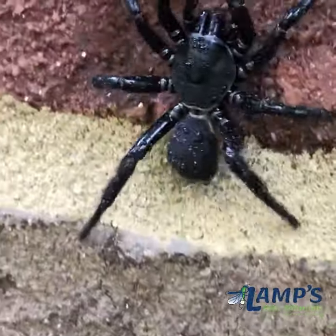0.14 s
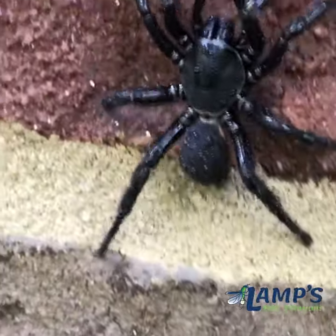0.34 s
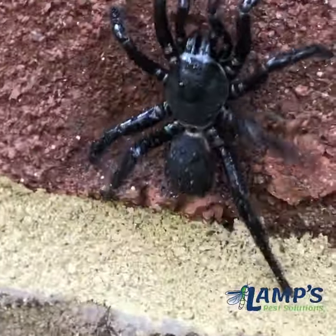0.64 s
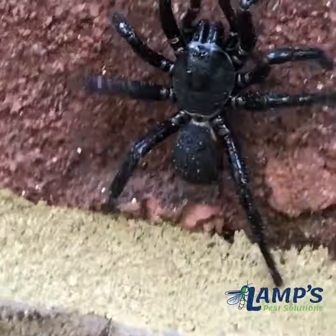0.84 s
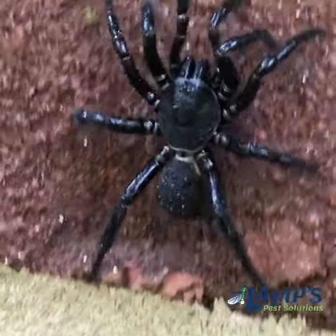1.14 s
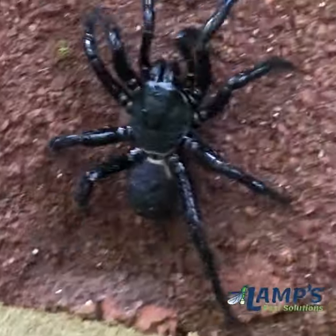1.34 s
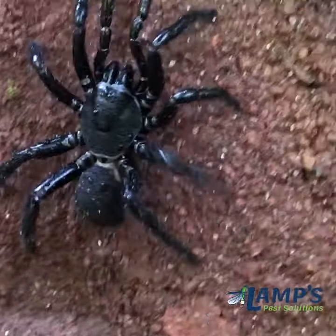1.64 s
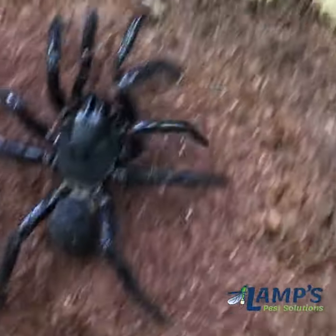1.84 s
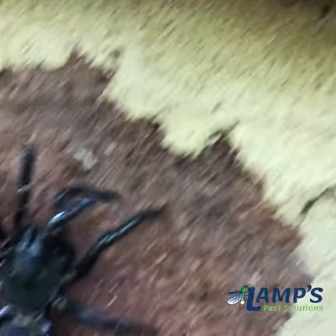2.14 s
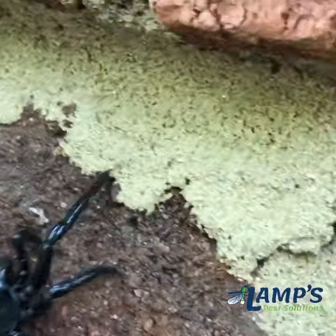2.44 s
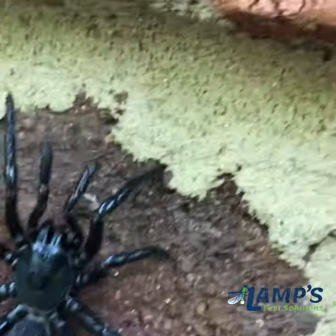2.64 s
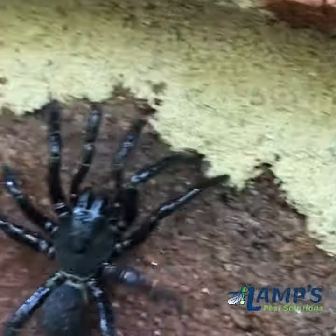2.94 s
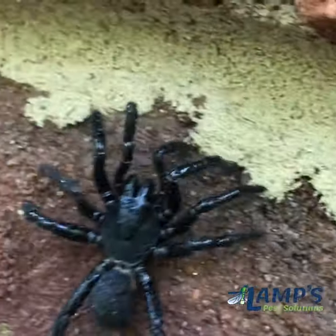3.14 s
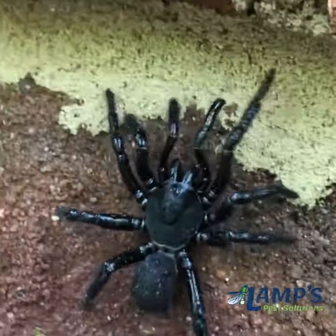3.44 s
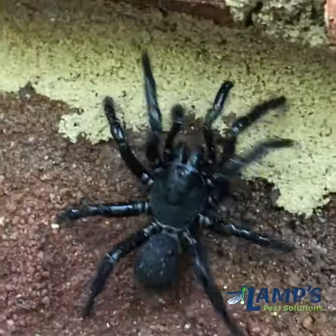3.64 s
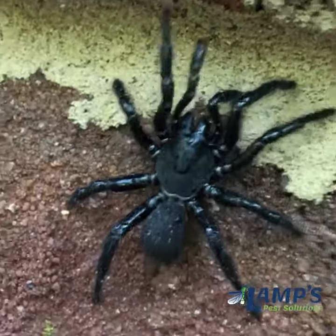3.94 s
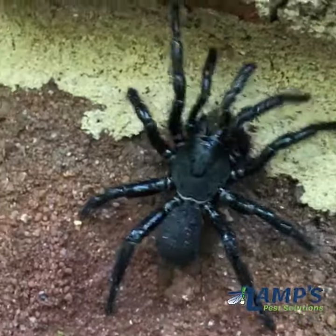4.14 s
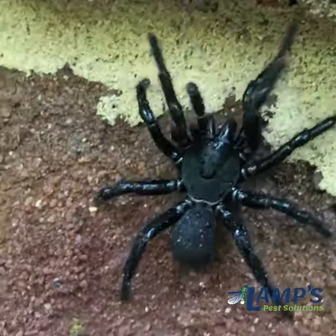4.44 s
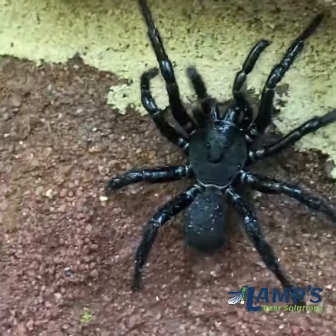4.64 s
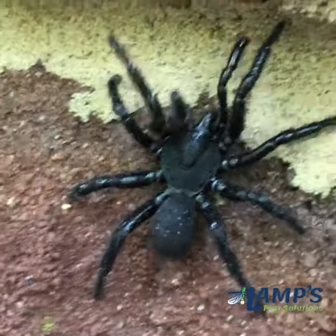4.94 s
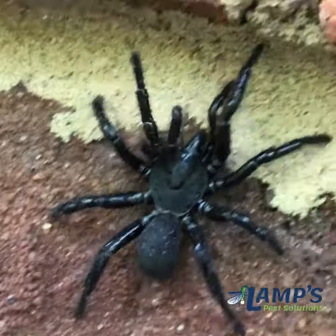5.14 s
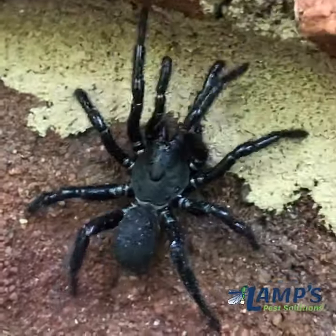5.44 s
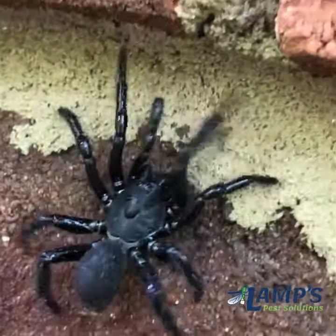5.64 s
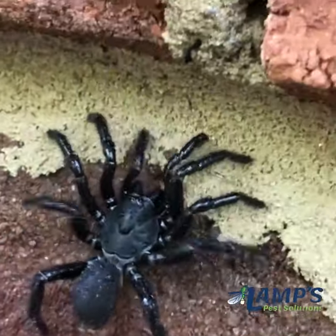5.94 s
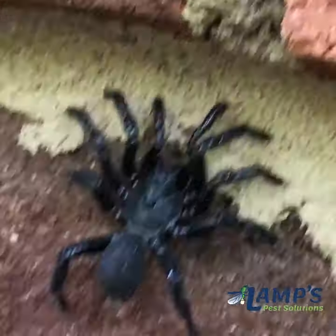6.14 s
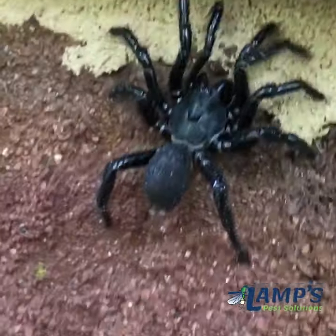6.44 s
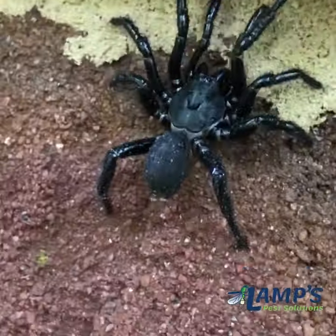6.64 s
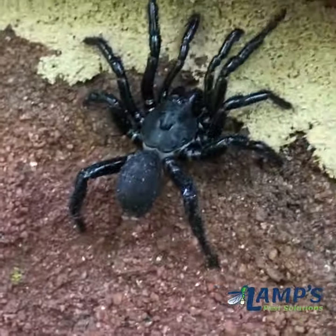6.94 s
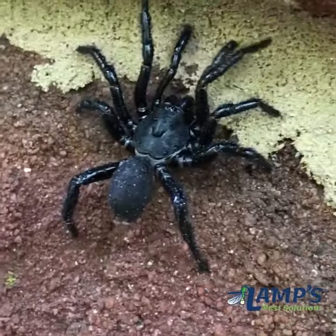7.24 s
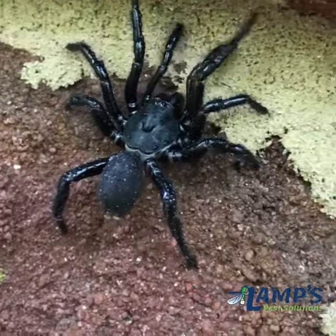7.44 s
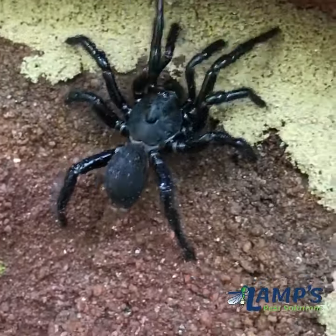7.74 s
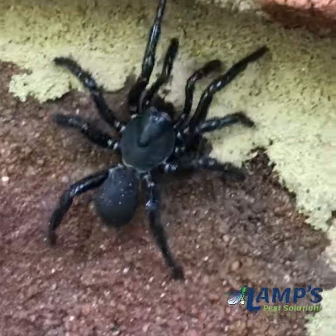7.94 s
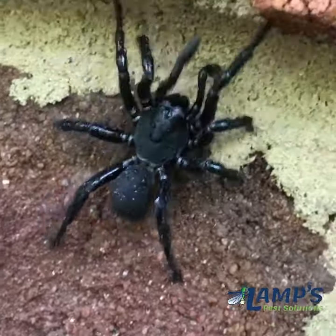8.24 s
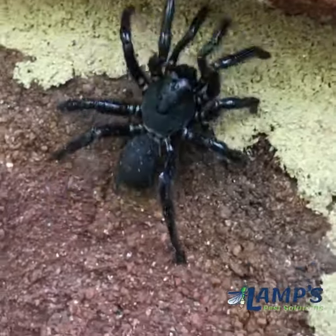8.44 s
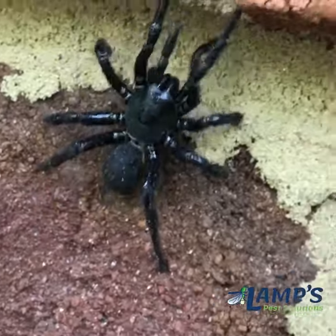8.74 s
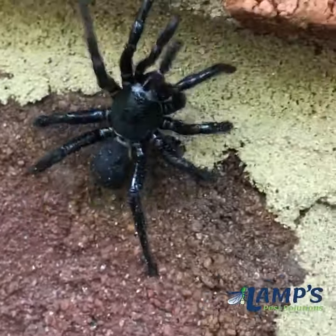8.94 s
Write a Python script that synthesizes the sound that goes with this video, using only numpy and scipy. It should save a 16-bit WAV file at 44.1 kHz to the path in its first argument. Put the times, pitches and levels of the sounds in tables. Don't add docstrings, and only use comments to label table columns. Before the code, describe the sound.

Low droning motor of a passing heavy vehicle, muffled tyre noise and faint hiss, a few tiny bird whistles, the note finally sliding down and away.

```python
import sys
import numpy as np
from scipy import signal
from scipy.fft import rfft, irfft, next_fast_len
from scipy.io import wavfile
from scipy.ndimage import uniform_filter1d, map_coordinates

SR = 44100
rng = np.random.default_rng(int(sys.argv[2]) if len(sys.argv) > 2 else 0)


def undo_db(level):
    steps = np.asarray(level, float) / 20
    return 10 ** steps


def unload_audio(sound):
    columns = np.transpose(np.atleast_2d(sound))
    steps = np.round(np.clip(columns, -1, 1) * 32767)
    wavfile.write(sys.argv[1], SR, steps.astype(np.int16))


N = 401310

# time in seconds, nearness in dB, tread facing the microphone in dB.
ROAD = [(0, 4, 1.5), (.9, 1, 4.5), (1.3, 3.5, 6), (2.1, 3, 8), (2.5, 4.5, 9.5), (2.95, 4, 8.5),
        (3.38, 7, 11.5), (3.62, 3, 8), (3.9, 4.5, 11), (4.3, 3, 8), (4.9, -2, 10.5), (5.3, 0.5, 7),
        (6, -2, 8.5), (6.4, -2.5, 8), (7.1, -3, 6), (7.5, -3.5, 3), (8.4, -7, 5), (9.1, -8, 7)]
# time in seconds, firing rate in Hz, engine level in dB, tyre level in dB.
SECOND_VEHICLE = [(0, 110, -41, -50), (1, 107.5, -62, -51.5), (2.2, 108.8, -49, -54.5),
                  (2.65, 109.6, -61, -47.5), (3.2, 110.6, -53, -47), (3.45, 111, -46, -51.5),
                  (4.5, 113.5, -48, -49.5), (5, 109.8, -50.5, -51), (5.9, 106.4, -49, -52),
                  (6.6, 104, -54, -51.5), (7.4, 101.7, -51, -51), (8.5, 99.3, -45.5, -56.5),
                  (8.8, 90.8, -48, -57), (9.1, 86.7, -55, -63)]


def unit(x):
    return x / np.sqrt(np.mean(x ** 2) + 1e-20)


def along(points, hz):
    f, v = np.transpose(points)
    return np.interp(np.log(hz + 1), np.log(f + 1), v)


def coloured(x, spectrum):
    m = next_fast_len(len(x))
    gain = undo_db(along(spectrum, np.fft.rfftfreq(m, 1 / SR)))
    return irfft(rfft(x, m) * gain, m)[:len(x)]


def curves(rows):
    s, *cols = np.transpose(rows)
    return [np.interp(np.arange(N) / SR, s, c) for c in cols]


def wobble(rate_hz):
    knots = rng.standard_normal(int(N * rate_hz / SR) + 4)
    return map_coordinates(knots, [np.arange(N) * rate_hz / SR])


def tone(hz, turn=0.):
    return np.sqrt(2) * np.sin(2 * np.pi * (np.cumsum(hz) / SR + turn))


def rush(spectrum, patchy_db):
    z = signal.stft(rng.standard_normal(N + 8192), nperseg=512)[2]
    field = uniform_filter1d(rng.standard_normal(z.shape), size=6, axis=0)
    field = uniform_filter1d(field, size=14, axis=1)
    x = signal.istft(z * undo_db(patchy_db * unit(field)), nperseg=512)[1]
    return unit(coloured(x, spectrum)[:N])


def swell(start_s, length_s, edge):
    u = np.clip((np.arange(N) / SR - start_s) / length_s, 0, 1)
    return u, np.abs(np.sin(np.pi * u)) ** edge * (u > 0) * (u < 1)


def glides(rows, waver, edge):
    x = np.zeros(N)
    for start_s, length_s, from_hz, to_hz, db in rows:
        u, arch = swell(start_s, length_s, edge)
        x += undo_db(db) * arch * tone((from_hz + (to_hz - from_hz) * u) * waver)
    return x


def exhaust():
    # time in seconds, firing rate in Hz, fundamental in dB, second harmonic relative to it in dB.
    boom_rows = [(0, 84.7, -29, -6.5), (1.4, 84.8, -30, -4.5), (1.9, 85.1, -28, -11.5),
                 (2.3, 85.1, -32, -12.5), (2.95, 85.36, -33, -9), (3.2, 83.3, -39, -4.5),
                 (3.45, 83.1, -39.5, -4), (3.9, 83.1, -32.5, -10), (4.4, 83.4, -33, -13.5),
                 (4.92, 83.5, -31, -11), (4.99, 83.1, -51, 0), (5.32, 81.47, -38, -19),
                 (6.0, 78.8, -35.5, -23), (6.72, 71.2, -38, -11), (7.1, 67.3, -36.5, -22),
                 (7.9, 59, -42.5, -14), (8.5, 52.8, -47.5, -14), (9.1, 43.3, -71, -3)]
    # multiple of the firing rate, level re second harmonic in dB.
    overtones = [(3, -30.5), (6, -35.5), (7, -44), (8, -28), (9, -31), (12, -27.5)]
    # start in seconds, length in seconds, multiple, level in dB.
    surfacing = [
        (.05, 0.98, 5, -59.5),
        (-.1, 0.65, 4, -61),
        (.6, 0.75, 6, -67.5),
        (.9, 0.31, 4, -58),
        (1.3, 1.75, 4, -59),
        (1.95, 1.1, 5, -73),
        (3.8, 1.3, 4, -59.5),
        (4.552, 0.57, 5, -63.5),
        (4.8, .5, 6, -66),
    ]
    throttle_shut_s, coast_second_flicker_db = 5, 3
    hz, first_db, under_db = curves(boom_rows)
    coasting = np.clip((np.arange(N) / SR - throttle_shut_s) / .1, 0, 1)
    second_db = first_db + under_db + coasting * coast_second_flicker_db * wobble(6.5)
    hz = hz * (1 + 0.00057 * wobble(20))
    boom = undo_db(first_db + 0.76 * wobble(13) + 0.52 * wobble(4)) * tone(hz)
    boom += undo_db(second_db + 0.48 * wobble(10) + .8 * wobble(3.1)) * tone(2 * hz, turn=0.25)
    for start_s, length_s, k, db in surfacing:
        arch = swell(start_s, length_s, edge=0.23)[1]
        boom += undo_db(db + 1.3 * wobble(7.4)) * arch * tone(round(k) * hz)
    for k, db in overtones:
        boom += undo_db(second_db + db + 2.2 * wobble(3.5)) * tone(round(k) * hz, rng.random())
    return boom


def road():
    # frequency in Hz, gain in dB.
    body_spectrum = [(60, -120), (120, -40), (175, -7.5), (190, 0.5), (210, -2), (300, -5), (480, -6),
                     (560, -2.5), (750, -5.5), (1000, -7), (1500, -45), (3000, -120)]
    second_tread_spectrum = [(300, -120), (600, -17), (800, -4.5), (1000, -0.5), (1200, 0.5), (1400, -4),
                             (1800, -35), (4000, -120)]
    ridge_spectrum = [(500, -120), (1000, -22), (1300, -0.5), (1500, 3), (1700, -2), (1850, -7),
                      (2200, -24), (5000, -120)]
    swish_spectrum = [(600, -120), (1200, -19), (1900, 0), (2500, 0), (3000, -6), (3500, -7), (3900, -13.5),
                      (4900, -14.5), (7000, -52), (9000, -120)]
    tyres_db, body_db = -58, -52
    near_db, facing_db = curves(ROAD)
    second_tyres_db = curves(SECOND_VEHICLE)[-1]
    body_db = body_db + 0.51 * near_db + 0.49 * (facing_db - facing_db.mean())
    flutter = wobble(9)
    body = undo_db(body_db + 0.55 * flutter + 0.51 * wobble(2.3)) * rush(body_spectrum, patchy_db=0.76)
    second = undo_db(second_tyres_db + 0.46 * flutter) * rush(second_tread_spectrum, patchy_db=1.25)
    ridge_db = tyres_db + near_db + facing_db - 1.5
    ridge = undo_db(ridge_db + 0.86 * flutter) * rush(ridge_spectrum, patchy_db=0.67)
    swish = undo_db(tyres_db + near_db + 0.29 * flutter) * rush(swish_spectrum, patchy_db=1.23)
    return body + second + ridge + swish


def turbo():
    # start in seconds, length in seconds, start pitch in Hz, end pitch in Hz, level in dB.
    spin_down = [
        (5.5, 1.2, 14780, 13620, -96),
    ]
    return glides(spin_down, 0.99, edge=.4)


def drone():
    # order in eighths of the firing rate, level in dB.
    crank_orders = [(3, -9), (5, -5), (8, -2), (10, -15.5)]
    # start in seconds, length in seconds, start pitch in Hz, end pitch in Hz, level in dB.
    far_engine = [
        (-.5, 4.4, 89.8, 97, -52.5),
        (5.6, 2.4, 83, 117.8, -55),
    ]
    hz, level_db, _ = curves(SECOND_VEHICLE)
    hz = hz * (1 + 0.0066 * wobble(8))
    near = np.zeros(N)
    for k, db in crank_orders:
        near += undo_db(level_db + db + 1.1 * wobble(2.0)) * tone(hz * round(k) / 8, rng.random())
    far = glides(far_engine, 1 + 0.013 * wobble(7.4), edge=0.44)
    return near + undo_db(3.2 * wobble(3.4)) * far


def birds():
    # start in seconds, length in seconds, top pitch in Hz, level in dB.
    song = [
        (3.675, .056, 8320, -67),
        (3.787, 0.05, 6670, -60.5),
        (3.89, .078, 5940, -62),
    ]
    slurs = [
        (1.152, .092, 7800, -68),
        (4.5, .055, 8300, -72.5),
    ]
    seeps = [
        (1.455, .042, 15200, -83),
        (2.77, .041, 15270, -88),
        (3.51, .032, 14160, -81),
    ]
    # share of the note, pitch as a ratio to the top, level in dB.
    arch = [(0, .89, -5), (.25, 1, 2), (.4, 0.98, -2), (.7, .97, 4), (1, .88, -1)]
    slur = [(0, .85, -8), (.4, .9, -3), (.63, .99, 0), (1, 1.005, -6)]
    level_note = [(0, 1, 0), (1, 1, 0)]
    # frequency in Hz, gain in dB.
    foliage = [(5000, 4), (6500, 1), (8300, -5), (14000, -18)]
    x = np.zeros(N)
    husk = wobble(300)
    # notes, shape, second harmonic in dB, quaver as a share of the pitch
    singers = [(song, arch, -42, .017), (slurs, slur, -13, .006), (seeps, level_note, -120, .006)]
    for notes, shape, second_db, quaver in singers:
        share, bend, swing_db = np.transpose(shape)
        for start_s, length_s, top_hz, db in notes:
            u = np.linspace(0, 1, int(length_s * SR))
            start = round(start_s * SR)
            hz = top_hz * np.interp(u, share, bend) * (1 + quaver * husk[start:][:len(u)])
            note = tone(hz) + undo_db(second_db) * tone(2 * hz)
            envelope = undo_db(db + np.interp(u, share, swing_db)) * np.abs(np.sin(np.pi * u)) ** 0.2
            x[start:][:len(u)] += envelope * note
    t = np.arange(SR // 3) / SR
    tail = rng.standard_normal(len(t)) * undo_db(-60 * t / .55)
    echoes = signal.fftconvolve(x, tail / np.linalg.norm(tail))[:N]
    return x + coloured(echoes, foliage)


def garden():
    # frequency in Hz, gain in dB.
    air_spectrum = [(1500, -66.5), (2600, -15), (3600, -1), (4200, -1), (4900, -3), (5600, -1), (6400, -1),
                    (7100, -4), (8000, -10.5), (9000, -14.5), (10000, -17), (10500, -21.5), (11200, -21),
                    (15600, -22.5)]
    rumble_spectrum = [(5, -29), (16, -22), (28, -22.5), (38, 1.5), (60, 6.5), (90, 8), (120, 0.5),
                       (150, -1), (185, -5), (205, -8.5), (300, -47), (500, -120)]
    # frequency in Hz, gain in dB.
    wall_notch = [(4650, 0), (4950, -3.5), (5250, 0)]
    air_db, town_db = -63, -45
    town_fades_s, town_fade_db_per_s = 7.25, 2
    leaves = coloured(rush(air_spectrum, patchy_db=0.67), wall_notch)
    hiss = undo_db(air_db + 0.17 * curves(ROAD)[0] + .45 * wobble(2.4)) * leaves
    fade_db = town_fade_db_per_s * np.maximum(np.arange(N) / SR - town_fades_s, 0)
    town = undo_db(town_db - fade_db + 0.5 * wobble(1.12)) * rush(rumble_spectrum, patchy_db=0.0)
    return hiss + town


def scene():
    return (exhaust() + road() + turbo() + drone() + birds() + garden())[None]


def band_limit(x):
    return signal.sosfilt(signal.butter(12, 15830, fs=SR, output="sos"), x)


def record(dry):
    # frequency in Hz, level in dB.
    clock_whine = [(10841, -105), (11826, -105), (12812, -106), (13797, -106)]
    top_hz = 15750
    whine = sum(undo_db(db) * tone(np.full(N, hz)) for hz, db in clock_whine)
    heard = coloured(dry[0] + whine, [(top_hz, 0), (top_hz + 10, -120)])
    return band_limit(heard[None])


dry = scene()
out = record(dry)
unload_audio(out)
```